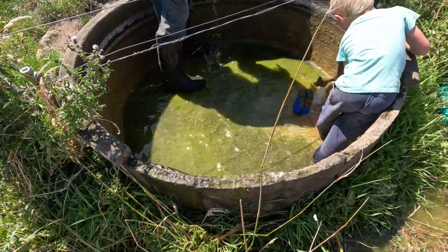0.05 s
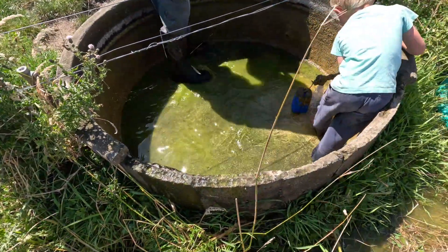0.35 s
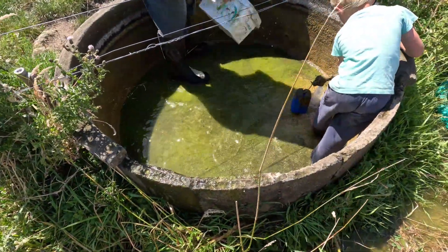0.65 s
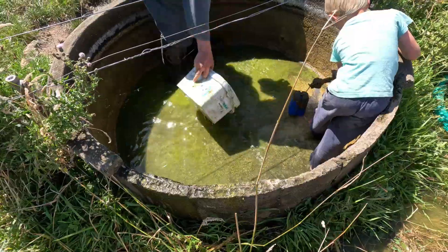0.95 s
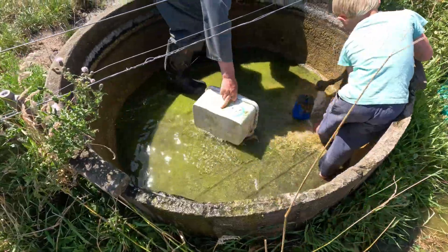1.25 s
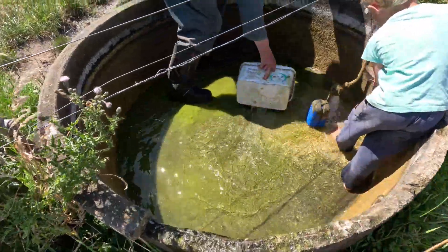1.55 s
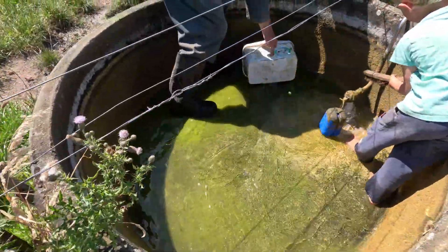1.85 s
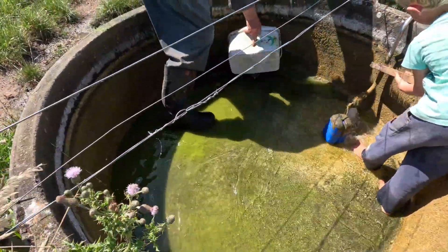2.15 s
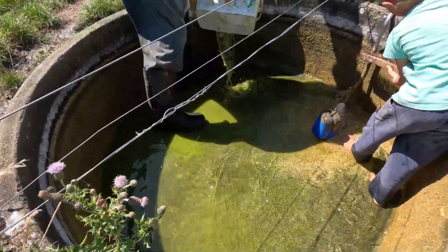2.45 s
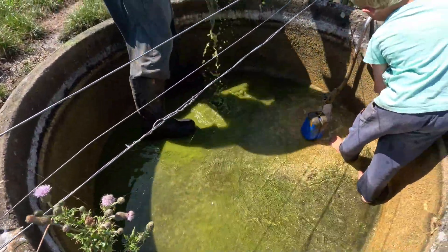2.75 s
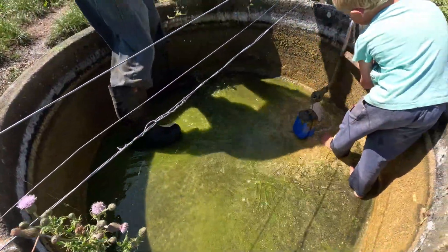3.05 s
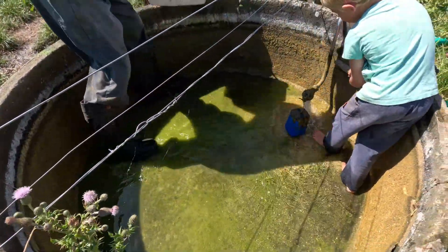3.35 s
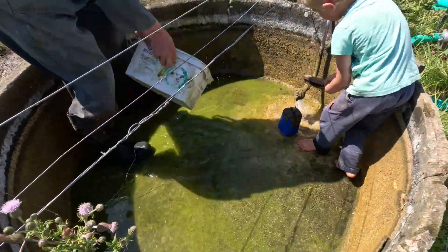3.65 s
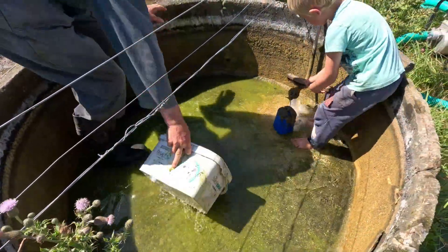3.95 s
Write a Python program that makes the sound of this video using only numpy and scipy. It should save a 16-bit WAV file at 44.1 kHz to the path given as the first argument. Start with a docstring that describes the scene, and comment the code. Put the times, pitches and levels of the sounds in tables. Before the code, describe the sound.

Water is bailed from a concrete trough outdoors: a plastic tub gulps under, rasps over the bottom and knocks with a hollow gurgle, followed by drips, splats and sloshing. Gusty wind buffets the microphone over a constant watery patter.

```python
"""Gusty wind buffets the microphone over a patter of falling water, and keeps on throughout.
A plastic tub is bailing shallow water out of a round concrete trough. It dips with a gulp of air,
rasps and bumps over the floor as water churns in, sounds a hollow note, and is lifted dribbling.
Thrown water patters down in ringing bubbles and dull splats, the water heaves against the wall,
and the tub dips again."""
import sys
import numpy as np
from scipy import signal
from scipy.fft import rfft, irfft, next_fast_len
from scipy.io import wavfile
from scipy.ndimage import map_coordinates

SR = 44100
rng = np.random.default_rng(int(sys.argv[2]) if len(sys.argv) > 2 else 0)


def master(y):
    """Save y as 16-bit WAV."""
    cut = np.clip(np.atleast_2d(y).T, -1, 1)
    pcm = np.round(cut * 32767)  # scale
    wavfile.write(sys.argv[1], SR, pcm.astype(np.int16))


N = 176400


def amp(db):
    """Decibels to gain."""
    return 10 ** (np.asarray(db) / 20)


def unit(x):
    """Scaled to rms 1."""
    return x / np.sqrt(np.mean(x ** 2) + 1e-20)


def eq_gain(points, hz):
    """Gain of an EQ curve drawn through (Hz, dB) points on a log axis."""
    corners, db = np.transpose(points)
    return amp(np.interp(np.log(hz + 1), np.log(corners + 1), db))


def curve(rows, column=1, outside=None):
    """One column of a time table as an automation curve, per sample."""
    rows = np.array(rows)
    return np.interp(np.arange(N) / SR, rows[:, 0], rows[:, column], outside, outside)


def swells(rows):
    """Envelope of bell-shaped swells."""
    t = np.arange(N) / SR
    powers = (amp(db) ** 2 * np.exp(-2 * ((t - at) / (0.8 * length)) ** 2) for at, length, db in rows)
    return np.sqrt(sum(powers))


def wobble(rate):
    """A smooth random curve, rate knots a second."""
    knots = rng.standard_normal(int(N * rate / SR) + 4)
    return map_coordinates(knots, [np.arange(N) * rate / SR])


def gurgle(hz, rate, steady=0):
    """A noise band around hz: a faster rate widens it, steady adds a pure tone."""
    phase = 2 * np.pi * np.cumsum(np.broadcast_to(hz, N)) / SR
    return unit((steady + wobble(rate)) * np.sin(phase) + wobble(rate) * np.cos(phase))


def filtered(x, response):
    """x through a frequency response."""
    size = next_fast_len(N + SR // 2)
    return irfft(rfft(x, size) * response(np.fft.rfftfreq(size, 1 / SR)), size)[:N]


def coloured(x, spectrum):
    """x through an EQ curve, at rms 1."""
    return unit(filtered(x, lambda hz: eq_gain(spectrum, hz)))


def add(track, start, sound):
    """Mix a sound in at start seconds."""
    part = track[max(round(start * SR), 0):][:len(sound)]
    part += sound[:len(part)]


def crackle(rate, spread_db):
    """Random clicks of uneven size, about rate a second."""
    hits = rng.random(N) < rate / SR
    sizes = amp(spread_db * np.clip(rng.standard_normal(N), -2, 2))
    return unit(hits * sizes * rng.choice([-1, 1], N))


# The wind's rise and fall. Each row: time in seconds, relative level in dB.
WIND_LEVEL = [(0, -30), (.4, -31.5), (.55, -29.5), (.78, -29), (.92, -32.5), (1.08, -35.5), (1.2, -32),
              (1.5, -33), (1.78, -29), (2.1, -34), (2.4, -33), (2.57, -30), (2.72, -38), (2.93, -33),
              (3.27, -29.5), (3.36, -45.5), (3.45, -30), (3.73, -30.5), (4, -39)]
# Gusts that reach the low mids. Each row: centre in seconds, length in seconds, level in dB.
GUSTS = [(.16, 0.23, -39.5), (0.742, 0.19, -36), (1.5, 0.43, -38.5), (2.566, 0.12, -38.5),
         (3.16, 0.12, -36), (3.731, 0.032, -35)]
# Tone of the rumble and of the buffets. Each row: frequency in Hz, gain in dB.
RUMBLE_EQ = [(15, -7), (28, 2), (62, -1), (125, -6), (250, -20.5), (2000, -60.5)]
BUFFET_EQ = [(50, -17), (120, -3), (270, -3), (400, -9), (700, -24.5), (3000, -54)]


def wind():
    """Wind on the microphone: a deep, heaving rumble, with brighter lumpy buffets in the gusts."""
    envelope = amp(curve(WIND_LEVEL) - 1.5 + 1.52 * wobble(14))
    rumble = coloured(rng.standard_normal(N), RUMBLE_EQ)
    buffets = coloured(rng.standard_normal(N) * amp(2.5 * wobble(90)), BUFFET_EQ)
    return envelope * rumble + swells(GUSTS) * buffets


def bubble(t, hz, t60, rise):
    """Trapped air rings and dies away, its pitch climbing by the fraction rise every t60 seconds."""
    phase = 2 * np.pi * hz * t * (1 + rise * t / t60 / 2)
    return np.sin(phase) * amp(-60 * t / t60) * (1 - np.exp(-t * hz))


def bubbles(rate, low_hz, high_hz, cycles, spread_db, rise):
    """A cloud of small bubbles, rate a second, each ringing for roughly cycles periods."""
    when, pitch, size, life = rng.random((int(rate * N / SR), 4)).T[:, :, None]
    hz = low_hz * (high_hz / low_hz) ** pitch
    age = np.arange(640)  # samples
    gain = amp(spread_db * np.minimum(-np.log(1 - size), np.pi)) * hz
    rings = gain * bubble(age / SR, hz, cycles * (.5 + life) / hz, rise)
    positions = (when * N).astype(int) + age
    return unit(np.bincount(positions.ravel(), rings.ravel(), N)[:N])


def trough_echo(x, t60=0.084, wet_db=-6):
    """The concrete ring adds a short, diffuse reverb."""
    out, hop = np.zeros(len(x) + SR), SR // 8
    for start in range(0, len(x), hop):
        tail = rng.standard_normal(hop) * amp(-60 * np.arange(hop) / SR / t60)
        echo = np.pad(amp(wet_db) * tail / np.linalg.norm(tail), (128, 0))  # pre-delay
        echo[0] = 1  # direct sound
        add(out, start / SR, signal.fftconvolve(x[start:start + hop], echo / np.linalg.norm(echo)))
    return unit(out[:N])


# The patter of falling water. Each row: time in seconds, relative level in dB.
SPRAY_LEVEL = [(0, -40.5), (.13, -39.5), (.33, -41), (.85, -41), (1.08, -43), (1.36, -39), (1.55, -42.5),
               (2.095, -39.5), (2.12, -47.5), (2.3, -41.5), (3.0, -39), (3.68, -39.5), (3.8, -44),
               (3.89, -40)]
# Its bright tone. Each row: frequency in Hz, gain in dB.
SPRAY_EQ = [(400, -13), (1000, -17), (2300, -5), (3100, -1), (3800, -4.5), (4700, -9.5), (7400, -16),
            (12000, -12)]


def spray():
    """Falling water: fine bubbles fizz over a wash of spatter."""
    fizz = trough_echo(bubbles(rate=1100, low_hz=1515, high_hz=8050, cycles=20, spread_db=5, rise=0.031))
    spatter = trough_echo(crackle(rate=5000, spread_db=-0.5))
    envelope = amp(curve(SPRAY_LEVEL) - 0.5 + 1.06 * wobble(35))
    return envelope * coloured(fizz + amp(7.5) * spatter, SPRAY_EQ)


# Sloshing in the trough. Each row: time in seconds, level in dB.
SLOSH_LEVEL = [(.2, -51.5), (1.1, -57.5), (1.3, -44), (1.6, -43.5), (1.8, -37.5), (2.03, -42), (2.13, -60),
               (2.3, -48.5), (2.65, -48.5), (3.5, -41.5), (3.81, -43), (3.89, -39.5), (4, -43.5)]
# Its darker tone. Each row: frequency in Hz, gain in dB.
SLOSH_EQ = [(300, -3.5), (900, -8.5), (1450, -4), (2000, -2), (3500, -7), (5000, -23), (10000, -65)]


def slosh():
    """Stirred water: coarser bubbles in a bed of noise."""
    cloud = bubbles(rate=700, low_hz=791, high_hz=3660, cycles=14.2, spread_db=3.0, rise=0.067)
    swill = coloured(trough_echo(cloud) + rng.standard_normal(N), SLOSH_EQ)
    return swill * amp(curve(SLOSH_LEVEL) + wobble(25.3))


def splat(t, hz, t60=0.055, span=1.83):
    """Water slaps the surface: a noise burst around hz, its top edge span times its bottom edge."""
    band = signal.butter(2, hz * np.sqrt([1 / span, span]), "band", fs=SR, output="sos")
    return unit(signal.sosfilt(band, rng.standard_normal(len(t)))) * amp(-60 * t / t60)


# Drops that plink. Each row: start in seconds, level in dB, pitch in Hz.
DROPS = [(0.12, -25, 3290), (1.868, -24, 2500), (2.524, -23, 2920), (2.706, -19.5, 2870)]
# Lumps of water. Each row: start in seconds, level in dB, band centre in Hz.
SPLATS = [(0.17, -34, 6900), (1.377, -29, 1450), (1.404, -26, 1920), (1.419, -38, 4950), (1.70, -30, 3300),
          (1.802, -26, 1903), (1.864, -35, 2915), (1.958, -26, 2290), (2.045, -28.5, 3370),
          (2.283, -35, 844), (2.889, -27.5, 2350), (2.942, -31.5, 6500), (3.012, -35, 6300),
          (3.52, -28.5, 2140)]


def drops(attack_s=0.0024, slap_db=-13):
    """Single drops slap and ring a bubble; lumps of water just splat."""
    out, t = np.zeros(N), np.arange(SR // 8) / SR
    attack = 1 - np.exp(-t / attack_s)
    for start, db, hz in DROPS:
        plink = bubble(t, hz, t60=.045, rise=.03) + amp(slap_db) * splat(t, hz)
        add(out, start, amp(db) * attack * plink)
    for start, db, hz in SPLATS:
        add(out, start, amp(db) * attack * splat(t, hz))
    return out


# Air swallowed as the tub dips. Each row: start in seconds, level in dB, pitch in Hz.
GULPS = [(.851, -36, 672), (3.899, -30.5, 691)]


def gulps(attack_s=0.0032):
    """A big bubble rings roughly as the rim goes under."""
    out, t = np.zeros(N), np.arange(SR // 4) / SR
    attack = 1 - np.exp(-t / attack_s)
    for start, db, hz in GULPS:
        roughness = 1 + wobble(309)[:len(t)]
        add(out, start, amp(db) * attack * roughness * bubble(t, hz, t60=0.14, rise=0.026))
    return out


# The plastic tub's modes. Each row: frequency in Hz, bandwidth in Hz, gain in dB.
TUB_MODES = [(153.6, 32, 0), (230, 25, -4.5), (430, 34, -11.5), (716, 60, -8.5)]


def tub_response(hz):
    """The tub's walls resonate in broad modes of alternating polarity."""
    return sum((-1) ** k * amp(db) * 1j * hz * width / (centre ** 2 - hz ** 2 + 1j * hz * width)
               for k, (centre, width, db) in enumerate(TUB_MODES))


# The drag over the floor. Each row: time in seconds, relative level in dB.
DRAG_LEVEL = [(1.17, -57.5), (1.35, -47), (1.55, -39.5), (1.83, -40), (1.9, -40.5), (2.0, -40.5),
              (2.1, -38), (2.125, -48.5), (2.3, -43), (2.45, -56.5)]
# Tone of the rasp. Each row: frequency in Hz, gain in dB.
RASP_EQ = [(170, -4), (700, 2), (1350, -4), (2200, -1.5), (3600, -8.5), (5000, -20.5), (9000, -42)]


def drag():
    """Grit catches the plastic: a rasp, with the tub's walls ringing along."""
    rasp = coloured(trough_echo(crackle(rate=2500, spread_db=2.5)), RASP_EQ)
    body = unit(filtered(rng.standard_normal(N), tub_response))
    return (rasp + body) * amp(curve(DRAG_LEVEL, outside=-120) + 3.5)


# Knocks of the tub. Each row: start in seconds, level in dB.
BUMPS = [(1.2, -26.5), (2.099, -17), (2.203, -19.5), (2.275, -25)]


def bumps():
    """The tub hits the concrete and all its modes thud at once."""
    out, t = np.zeros(N), np.arange(SR // 4) / SR
    for start, db in BUMPS:
        thud = sum(amp(gain_db) * np.sin(2 * np.pi * (hz * t + rng.random())) * np.exp(-np.pi * width * t)
                   for hz, width, gain_db in TUB_MODES)
        add(out, start, amp(db) * thud / np.abs(thud).max())
    return out


# Water rushing into the tub. Each row: time in seconds, level in dB, resonance in Hz.
INRUSH = [(1.35, -58, 478), (1.425, -32, 450.7), (1.48, -35, 361.4), (1.54, -35, 489.8), (1.63, -38.5, 579),
          (1.78, -62, 708)]


def inrush(fill_s=0.28):
    """Water pours into the tub's mouth: a moving resonance that widens into churning as it fills."""
    hz = curve(INRUSH, column=2)
    narrow, wide = gurgle(hz, rate=130), gurgle(hz, rate=450)
    filled = np.clip((np.arange(N) / SR - INRUSH[0][0]) / fill_s, 0, 1)
    churn = np.sqrt(1 - filled ** 2) * narrow + filled * wide
    return churn * amp(curve(INRUSH, outside=-120))


# The note of the tub's hollow. Each row: time in seconds, level in dB, pitch in Hz.
HOLLOW_NOTE = [(1.84, -56, 360), (1.92, -34.5, 295.3), (1.99, -40.5, 271.4), (2.03, -22.5, 226.3),
               (2.075, -37, 224), (2.105, -28, 278.5), (2.175, -43.5, 225.8), (2.21, -30.5, 233),
               (2.29, -34.5, 265.7), (2.48, -43, 231)]


def hollow_note():
    """The air in the tub sounds a gurgling note that glides as the tub tilts and fills."""
    note = gurgle(curve(HOLLOW_NOTE, column=2), rate=100, steady=1)
    return note * amp(curve(HOLLOW_NOTE, outside=-120))


# Heaves of water. Each row: centre in seconds, length in seconds, level in dB.
SURGES = [(3.155, 0.086, -46), (3.72, 0.056, -42.5)]


def surges():
    """Water heaves against the wall in short hollow swells."""
    return swells(SURGES) * gurgle(hz=477, rate=550)


def scene():
    """The mono mix of wind, water and tub."""
    air = wind()
    water = (spray() + slosh()) * amp(0.96 * wobble(50))  # both flutter together
    return (air + water + drops() + gulps() + drag() + bumps() + inrush() + hollow_note() + surges())[None]


# The microphone's tone. Each row: frequency in Hz, gain in dB.
MICROPHONE_EQ = [(20, 2), (7400, 0.5), (8600, -11.5), (9700, -26), (11200, -26.5), (13000, -35.5)]


def record(dry, top_hz=13500):
    """The microphone dulls the treble and passes nothing above top_hz."""
    return filtered(dry[0], lambda hz: eq_gain(MICROPHONE_EQ, hz) * (hz < top_hz))[None]


dry = scene()
out = record(dry)
master(out)
```